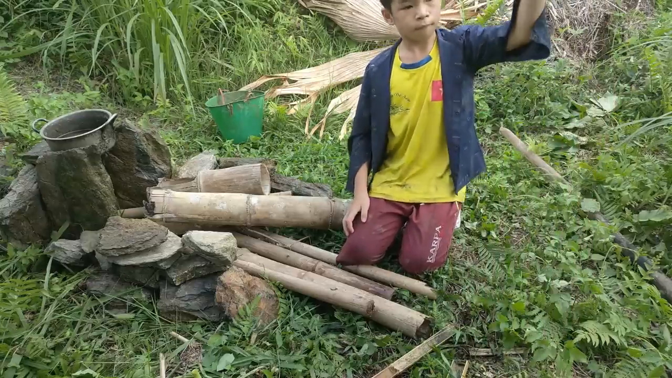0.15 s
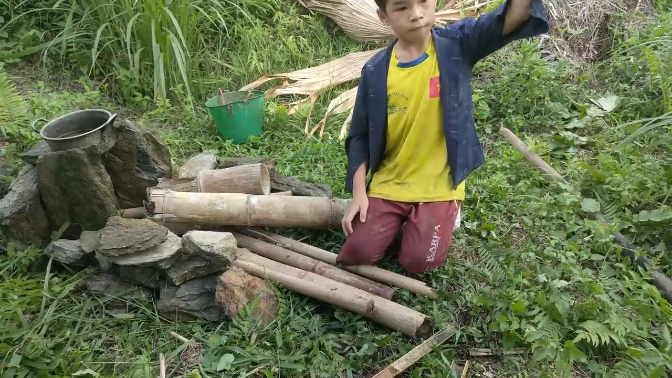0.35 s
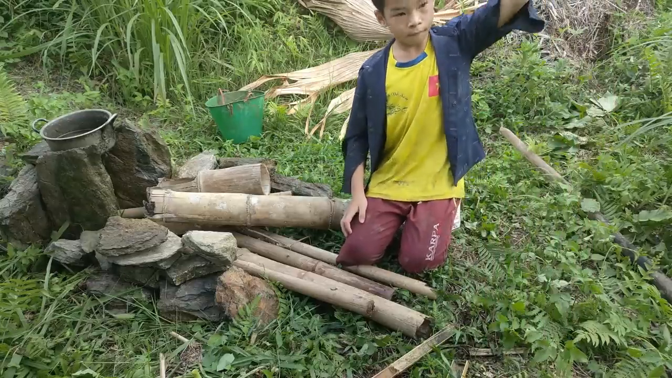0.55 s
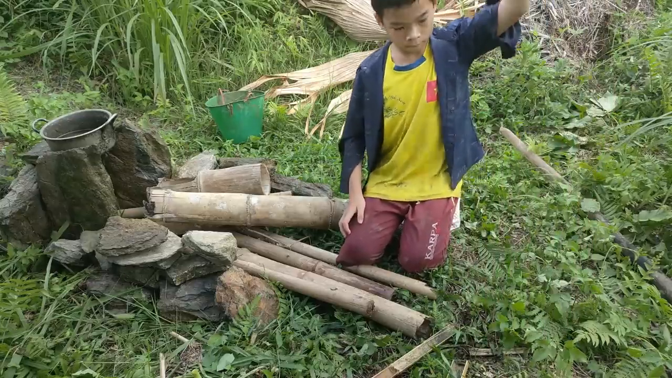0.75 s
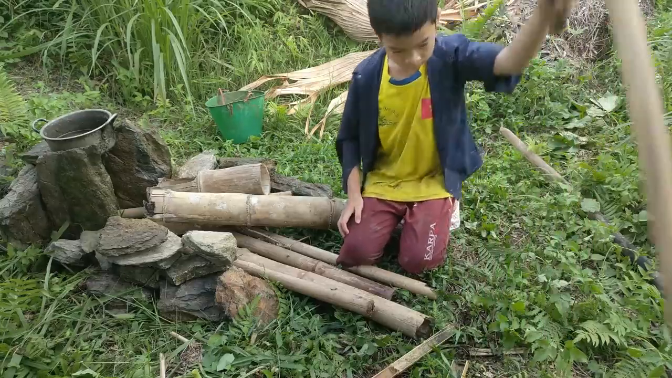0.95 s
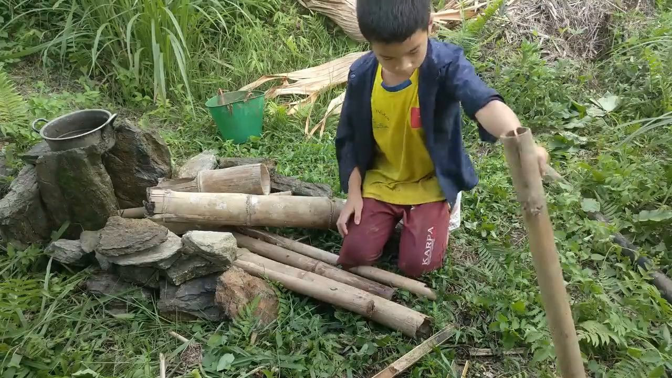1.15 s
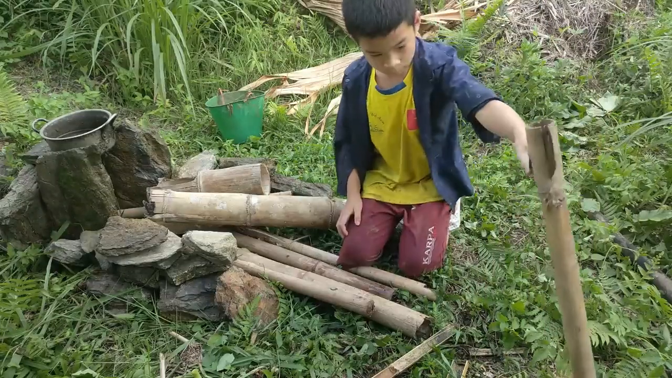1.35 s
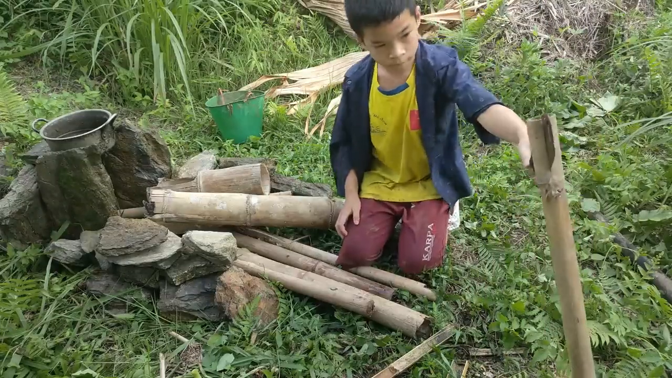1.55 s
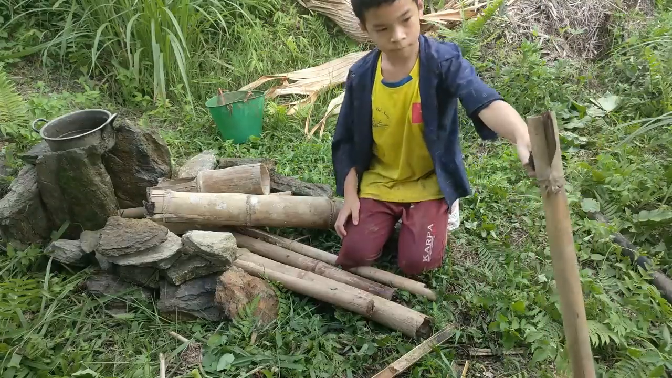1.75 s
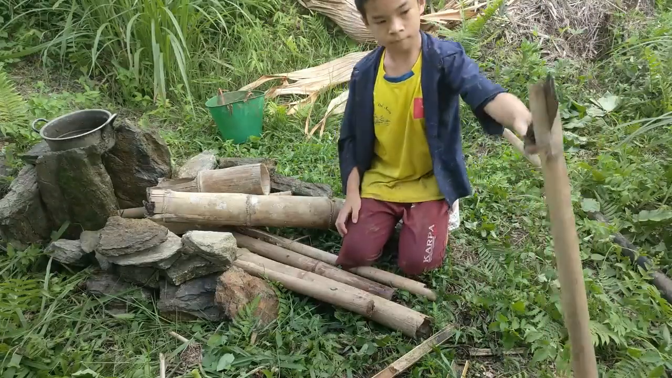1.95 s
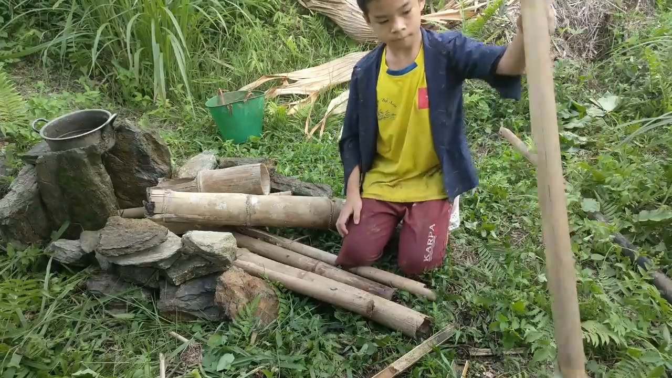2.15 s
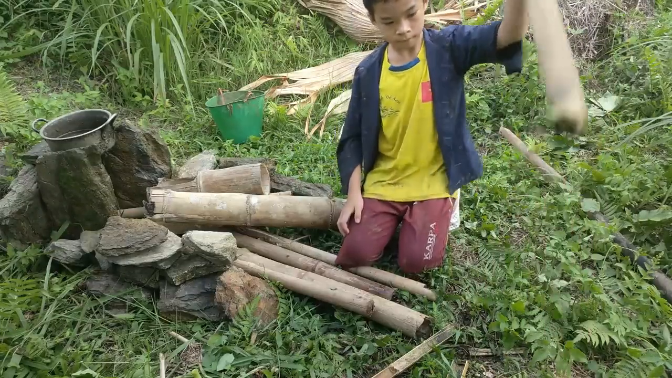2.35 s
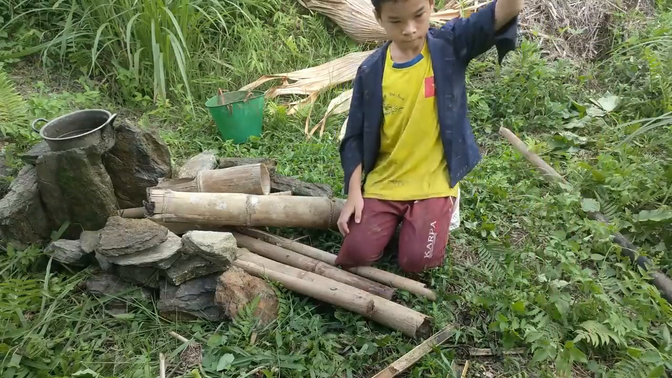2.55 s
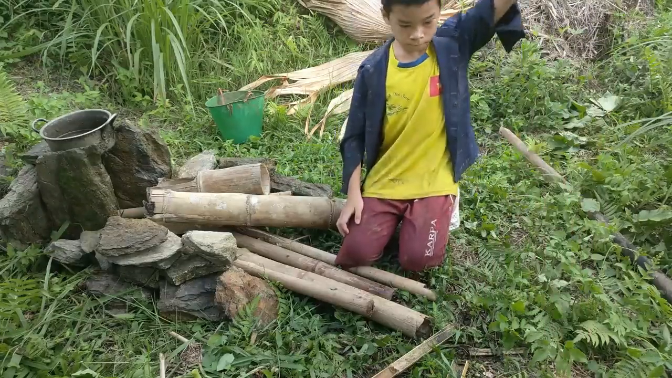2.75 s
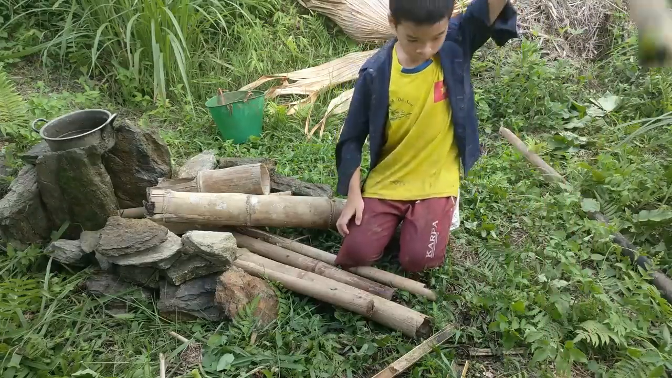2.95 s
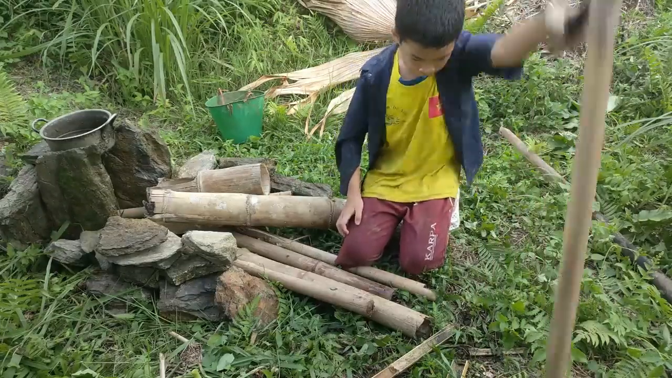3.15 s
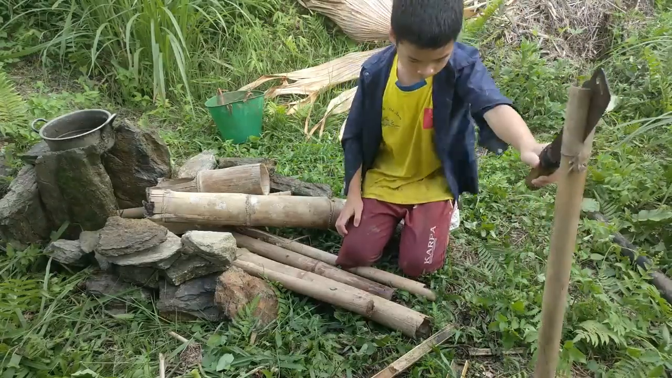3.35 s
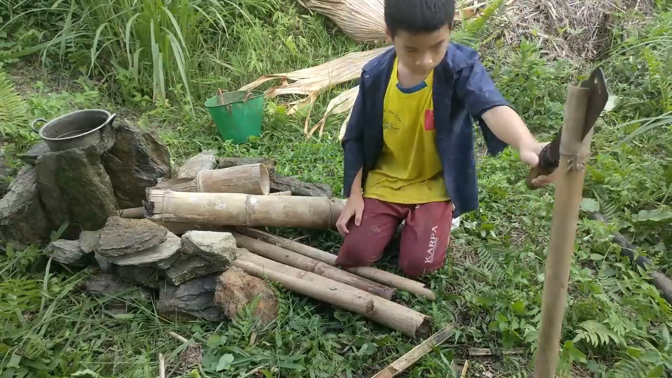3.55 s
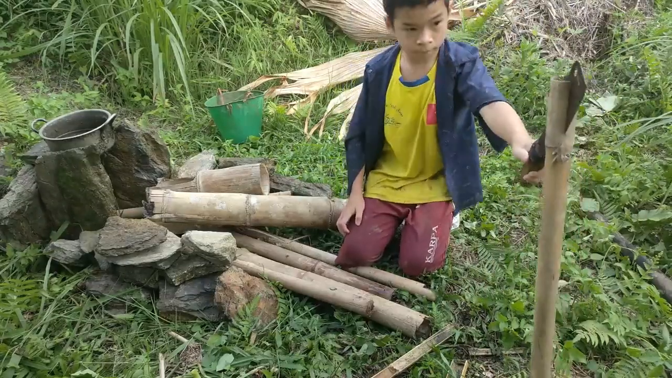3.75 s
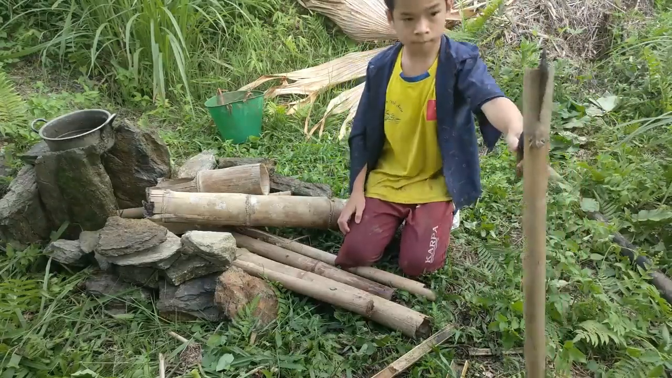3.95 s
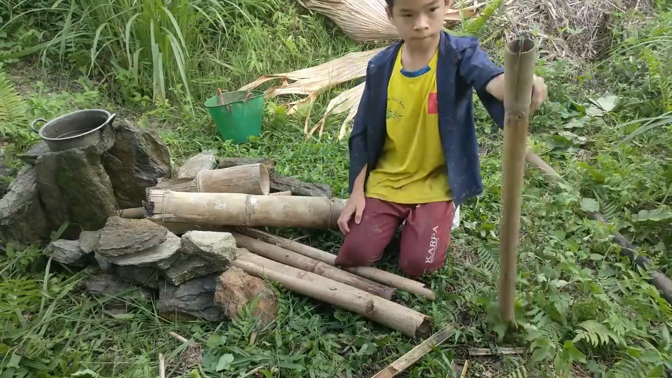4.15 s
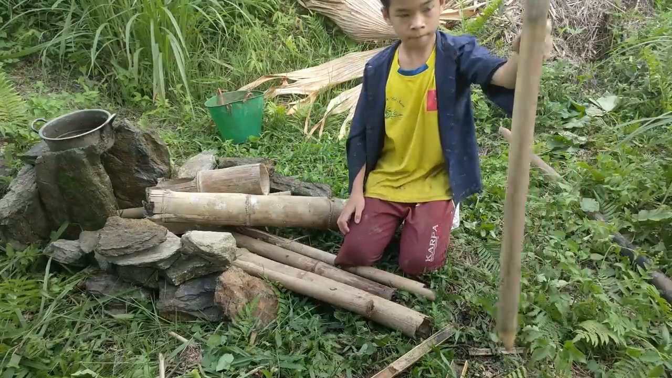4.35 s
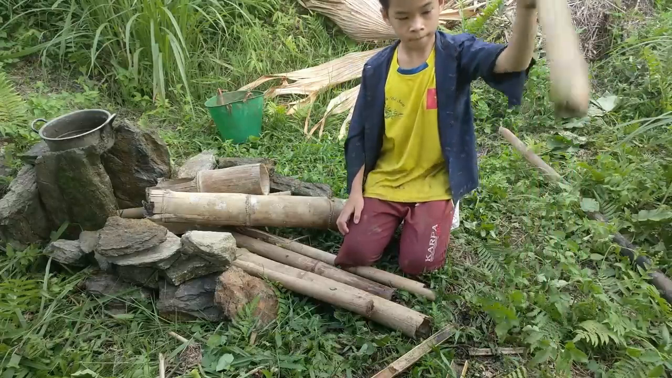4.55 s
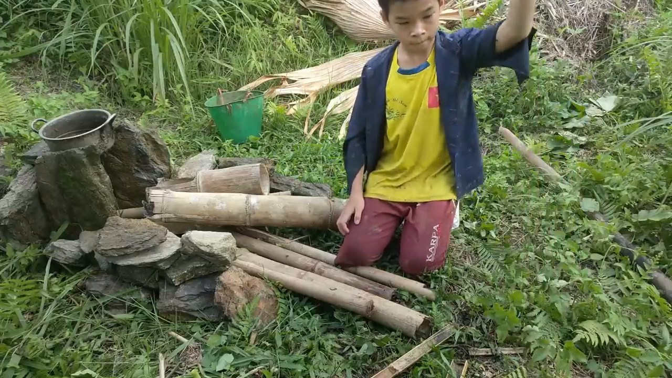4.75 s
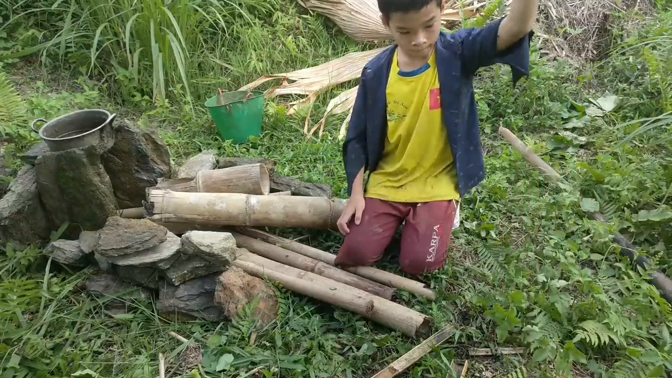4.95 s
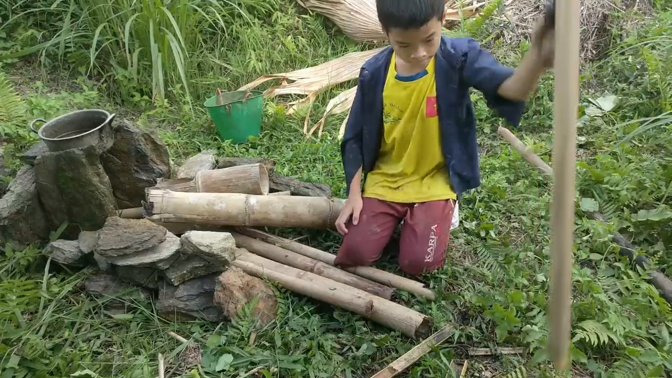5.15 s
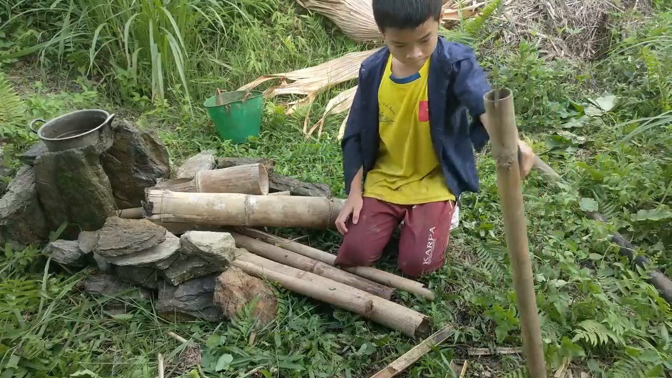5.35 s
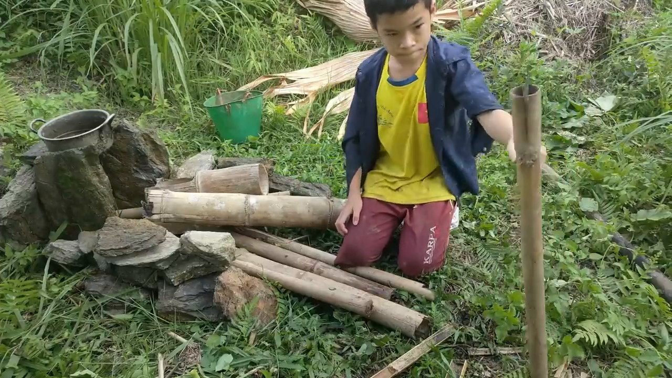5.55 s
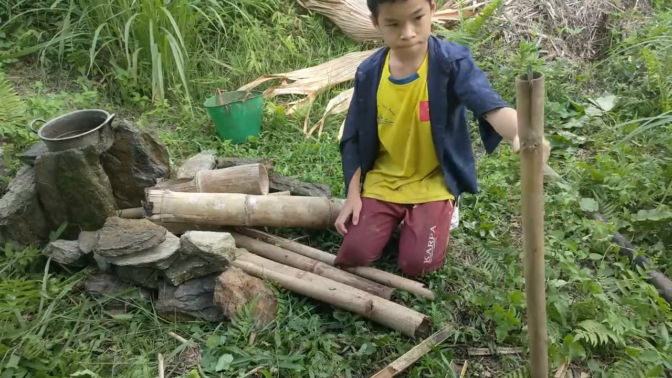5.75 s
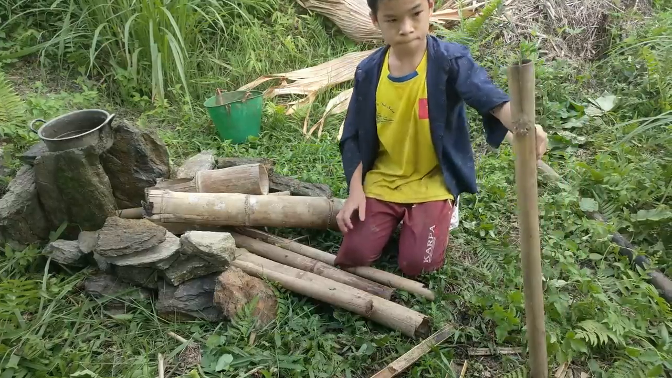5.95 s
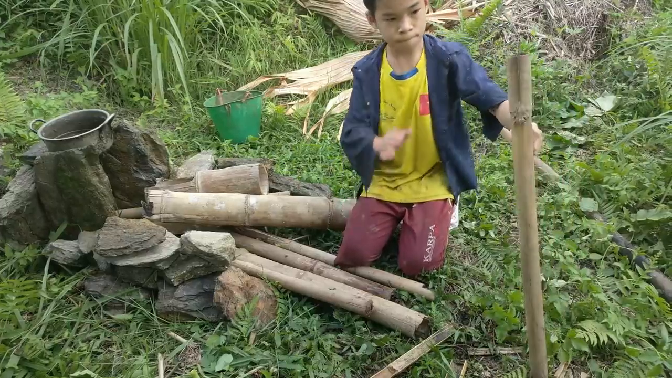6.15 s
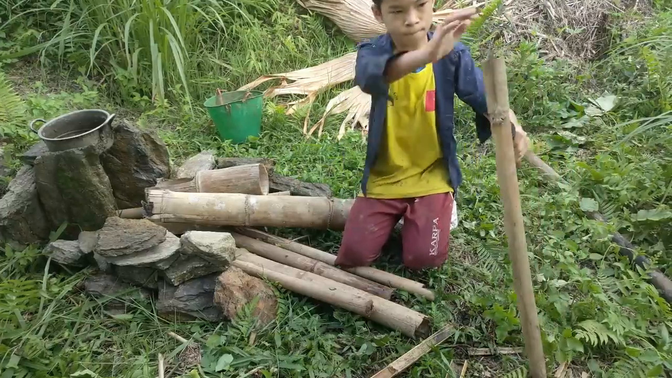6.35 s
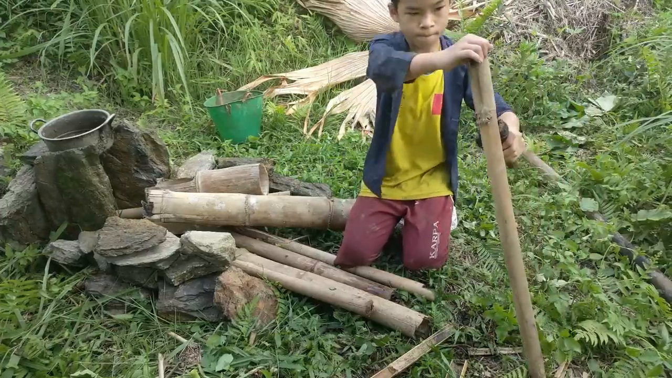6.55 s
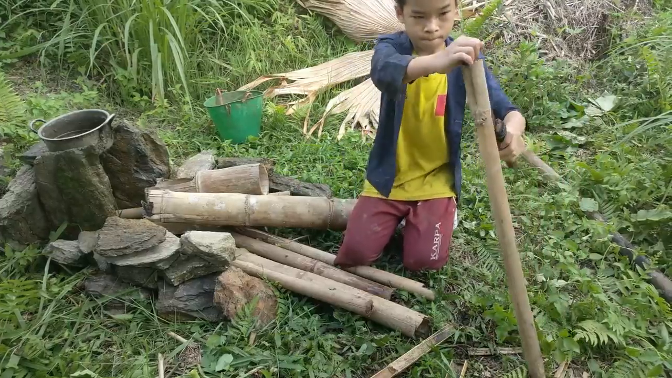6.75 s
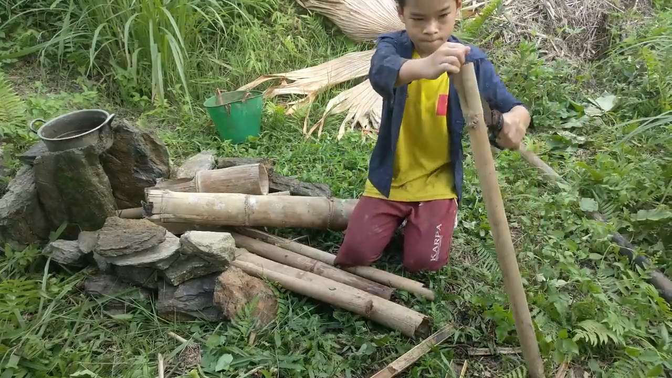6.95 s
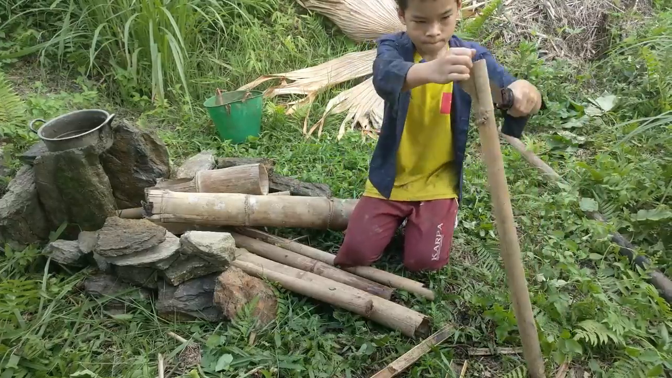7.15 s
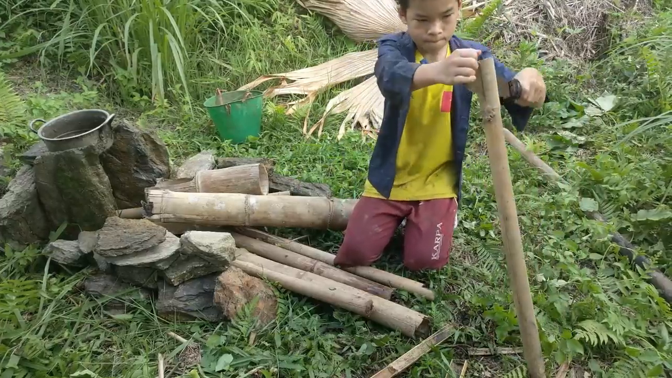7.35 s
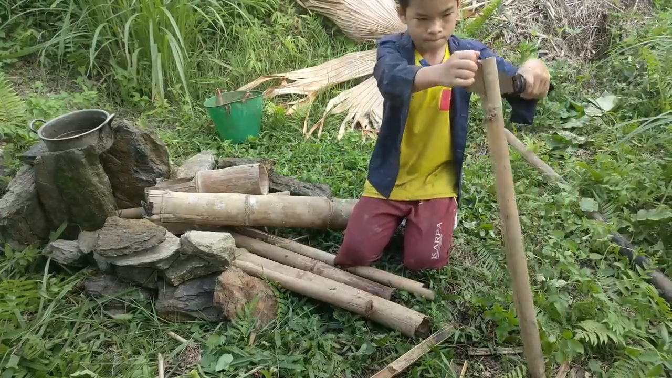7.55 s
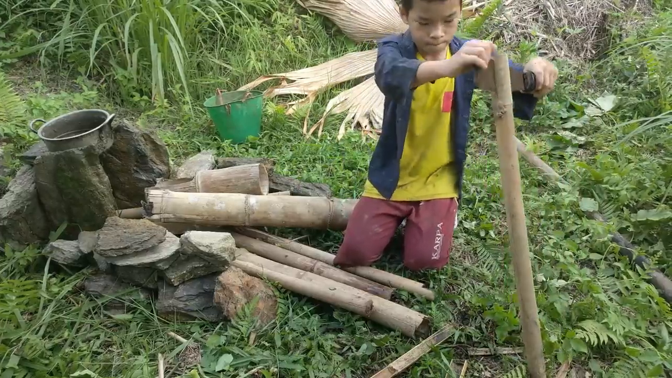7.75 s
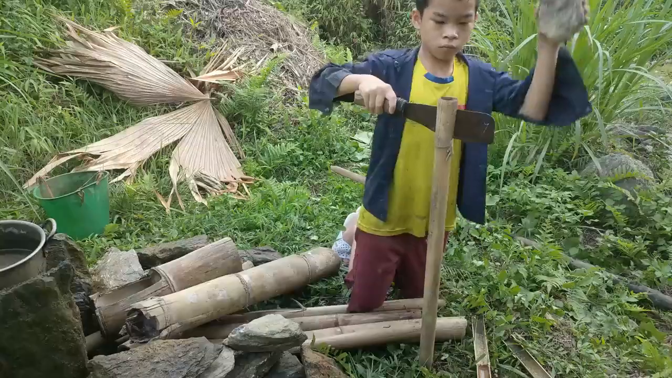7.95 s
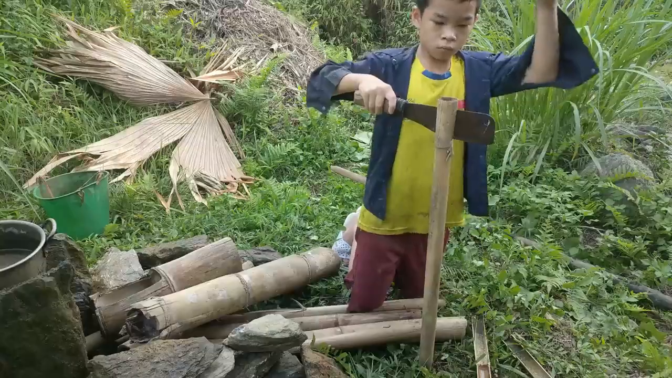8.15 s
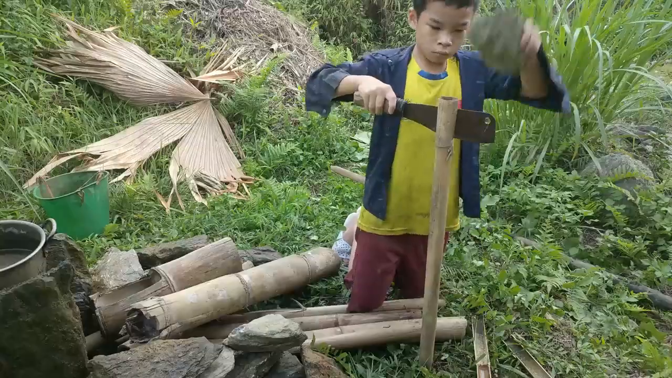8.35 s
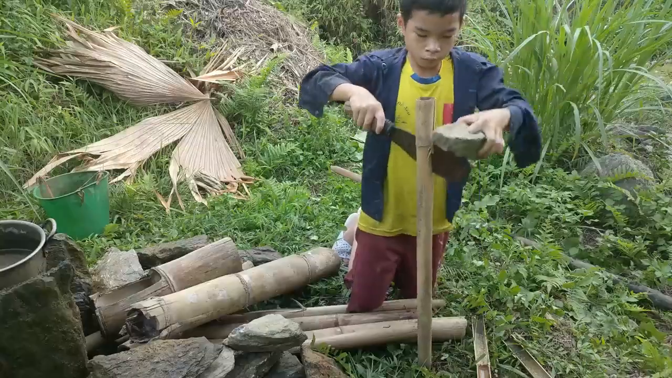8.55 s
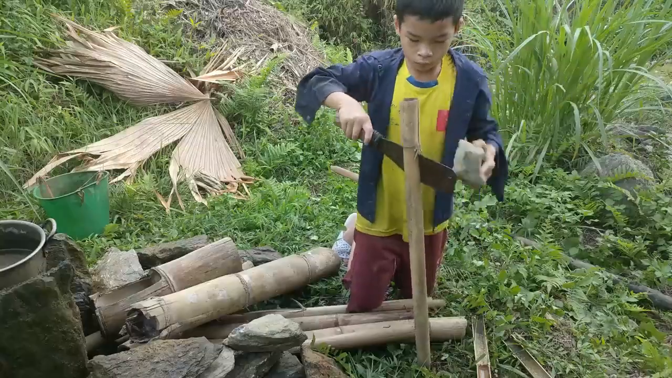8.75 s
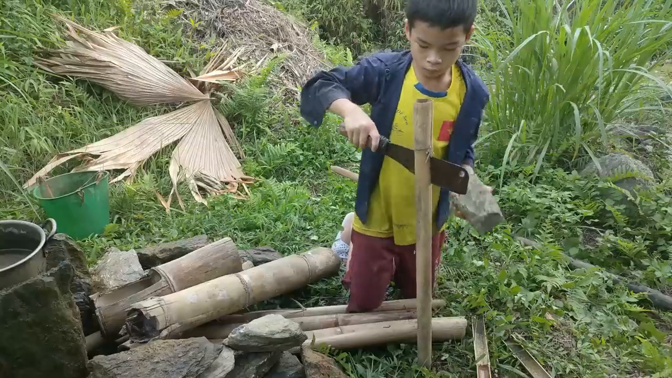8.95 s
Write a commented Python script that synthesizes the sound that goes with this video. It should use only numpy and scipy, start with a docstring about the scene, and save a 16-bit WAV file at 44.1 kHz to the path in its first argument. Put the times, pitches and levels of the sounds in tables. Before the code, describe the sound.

Outdoors among vegetation, a wide soft hiss of insects and air runs throughout. A cricket trills in half-second bursts about once a second near 4.9 kHz, with a fainter one answering; a one-cylinder engine putters far to the right, slightly stronger after 6 s. Tiny paired bird chips come near 0.2, 3.7 and 7.3 s, with occasional faint hoots. Close by, a small bright crack at 0.1 s. A bamboo pole slams on soil at 1.2 s, with a hollow crack and thump; again at 3.4 s, a longer, splintering cluster; and at 5.4 s, short and heavy. Soft knocks at 4.0, 4.1 and 6.1 s, then handling and dry scraping around 6.9-7.5 s. A light tick at 8.1 s precedes a stone's loud blow at 8.54 s, cracking and ringing split bamboo and blade, with scraping and knocks until 8.8 s. Background ducks after loud blows, then recovers by 9 s.

```python
"""Throughout, wide air, a one-cylinder engine far to the right, trilling crickets, a few bird chips and hoots.
Close to the microphones a bamboo pole with a wedged knife cracks, then is slammed on soil near 1.2, 3.4 and 5.4 s.
It is handled and scraped between blows; from 7.9 s, split open, it and the blade ring under a stone.
Bursts of snapping-fibre noise stir resonances of pole and blade; short pushes stir air and ground; chirps,
chips and hoots are sine tones, and puffs drive the exhaust. Gain control ducks after each loud blow."""
import sys
import numpy as np
from scipy import signal
from scipy.fft import rfft, irfft, next_fast_len
from scipy.io import wavfile
from scipy.ndimage import uniform_filter1d, map_coordinates

SR = 44100
rng = np.random.default_rng(int(sys.argv[2]) if len(sys.argv) > 2 else 0)


def pcm_store(signal):
    """Save signal as 16-bit PCM."""
    levels = np.round(np.clip(np.atleast_2d(signal), -1, 1) * 32767)
    wavfile.write(sys.argv[1], SR, levels.astype(np.int16).T)


N = 397782


def amp(db):
    """Amplitude factor of a level in dB."""
    return 10 ** (np.asarray(db) / 20)


def unit(x):
    """x scaled to an RMS of one."""
    return x / np.sqrt(np.mean(x ** 2) + 1e-20)


def along(points, hz):
    """Values at hz between (frequency, value) points on a log axis."""
    f, v = np.transpose(points)
    return np.interp(np.log(hz + 1), np.log(f + 1), v)


def curves(rows):
    """One value per sample for each column after the time."""
    s, *cols = np.transpose(rows)
    return [np.interp(np.arange(N) / SR, s, c) for c in cols]


def wobble(rate):
    """A smooth random curve, rate knots a second."""
    knots = rng.standard_normal(int(N * rate / SR) + 4)
    return map_coordinates(knots, [np.arange(N) * rate / SR])


def filtered(x, response):
    """x times a complex response of frequency."""
    m = next_fast_len(N + SR // 2)
    return irfft(rfft(x, m) * response(np.fft.rfftfreq(m, 1 / SR)), m)[..., :N]


def resonant(x, modes):
    """x through causal resonances of alternating sign, scaled so that white noise keeps its power."""
    def gain(f):
        total = 0
        for k, (centre, width, db) in enumerate(modes):
            damping = 1j * f * width
            total = total + (-1) ** k * amp(db) * damping / (centre * centre - f * f + damping)
        return total
    return filtered(x, gain) / np.sqrt(np.mean(abs(gain(np.arange(SR / 2))) ** 2))


def add(track, s, sound):
    """Mix a sound in at s seconds."""
    k = max(round(s * SR), 0)
    track[k:k + len(sound)] += sound[:len(track[k:])]


def placed(x, lag_s, pan_db):
    """Arrival at the microphone pair: left lags right by lag_s and is pan_db louder."""
    side = np.array([[.5], [-.5]])
    return amp(pan_db * side) * filtered(x * np.ones((2, 1)), lambda hz: np.exp(-2j * np.pi * hz * lag_s * side))


FAR_LAG_S = 4.5e-4  # far sounds reach the left microphone later
PATCH_FROM_HZ = 300  # the bass of the background stays even
# far insects, leaves and air: (time [s], level [dB])
AIR_LEVEL = [(0, -46.5), (1, -47.5), (2.3, -47.5), (3.2, -46.5), (4.3, -47.5), (5.2, -46.5), (6.2, -45.5),
             (7.5, -46), (8.3, -46.5), (9, -43.5)]
# their spectrum: (frequency [Hz], relative density [dB per Hz])
AIR_COLOUR = [(12, -34), (25, -2), (60, -10.5), (120, -8), (240, -14), (450, -14.5), (740, -12.5),
              (1150, -17.5), (2020, -16), (3500, -20.5), (4900, -14.5), (5850, -17.5), (6360, -32.5),
              (7450, -14), (8300, -36.5), (9200, -49.5), (16000, -33)]
# how alike the two microphones hear them: (frequency [Hz], likeness [0 to 1])
AIR_LIKENESS = [(30, 0.5), (60, 1), (200, 1), (400, 0.99), (900, 0.38), (2500, 0.44), (5000, 0.023)]


def field(patchy_db):
    """Background noise with patches of random gain, wide in the treble, lagging on the left like the engine."""
    bins, _, z = signal.stft(rng.standard_normal((2, N)), SR, nperseg=512)
    patches = uniform_filter1d(rng.standard_normal(z.shape[1:]), 5, 0)  # across frequency
    patches = uniform_filter1d(patches, 8, 1)  # across time
    gain = amp(patchy_db * unit(patches) * (bins > PATCH_FROM_HZ)[:, None])
    pair = signal.istft(z * gain, nperseg=512)[1][:, :N]

    def mid_side_gain(hz):
        turn = np.arccos(np.clip(along(AIR_LIKENESS, hz), -1, 1)) / 2
        return amp(along(AIR_COLOUR, hz)) * [np.cos(turn), np.sin(turn)]

    mid, side = filtered(pair, mid_side_gain)
    lagged = placed(np.array([mid + side, mid - side]), FAR_LAG_S, pan_db=0)
    return amp(curves(AIR_LEVEL)[0]) * unit(lagged)


# faint far hoots: (start [s], end [s], frequency [Hz], level [dB])
HOOTS = [(.65, 0.93, 827, -54), (4.1, 4.202, 862, -47.5), (4.208, 4.45, 415, -53.5),
         (4.853, 4.982, 408, -49.5), (5.639, 5.752, 716, -60), (5.768, 5.824, 735, -49)]


def hoots():
    """Soft far tones whose pitch and level waver together."""
    out, waver = np.zeros(N), wobble(22)
    for first, last, hz, db in HOOTS:
        part = waver[round(first * SR):round(last * SR)]
        tone = np.sin(2 * np.pi * hz * np.cumsum(1 + 0.01 * part) / SR)
        add(out, first, amp(db + part) * np.hanning(len(part)) * tone)
    return out


# pace of the far engine: (time [s], firings [per s])
ENGINE_SPEED = [(0, 14.72), (1.5, 14.94), (3, 14.59), (4, 15.82), (4.8, 15.73), (6, 15.01), (7.2, 14.23),
                (8, 14.87), (9.02, 15.89)]
# its loudness at this distance: (time [s], level [dB])
ENGINE_LEVEL = [(0, -56), (2.5, -55.5), (4.5, -54.5), (6.5, -49.5), (8.4, -52), (9, -52.5)]
# resonances of its exhaust pipe: (frequency [Hz], width [Hz], relative level [dB])
EXHAUST_MODES = [(172, 12.4, 10.5), (102, 26, -3.5), (204.3, 10, 1.5), (32, 17, -10.5)]


def engine():
    """One uneven puff per firing through the exhaust pipe."""
    count = np.floor(np.cumsum(curves(ENGINE_SPEED)[0]) / SR + .156)  # part of a cycle already run
    fired = np.diff(count, prepend=count[0]) > 0
    puffs = fired * amp(.9 * rng.standard_normal(N))
    return amp(curves(ENGINE_LEVEL)[0]) * unit(resonant(puffs, EXHAUST_MODES))


CHIP_DB, CHIP_GAP_S, PAIR_GAP_S = -42, .035, .185  # gaps run from start to start
# phrases of a small bird: (time [s], pairs of chips [count])
BIRD_PHRASES = [(.222, 2), (3.711, 3), (7.339, 2)]


def bird():
    """Pairs of short chips, each a tone gliding down."""
    out, t = np.zeros(N), np.arange(round(.016 * SR)) / SR
    glide = np.sin(2 * np.pi * (5550 * t - 24000 * t * t))
    chip = amp(CHIP_DB) * np.hanning(len(t)) * glide
    for s, pairs in BIRD_PHRASES:
        for k in range(pairs):
            add(out, s + PAIR_GAP_S * k, chip)
            add(out, s + PAIR_GAP_S * k + CHIP_GAP_S, chip)
    return out


CHIRP_S, STROKE_S = .0391, .011  # spacing of chirps, and of wing strokes in a chirp
RASP = .07  # phase wander of a wing stroke [radians a sample]


def cricket(trills, pitch_hz, late, strokes_db, uneven_db):
    """Trills that swell and rise a little; each chirp is three wing strokes of a tone."""
    out, t = np.zeros(N), np.arange(round(.0125 * SR)) / SR
    for first, last, db in trills:
        chirps = np.linspace(first, last, round((last - first) / CHIRP_S) + 1)
        for s in chirps[chirps > 0]:
            early = ((last - s) / .45) ** 2
            for k, stroke_db in enumerate(strokes_db):
                scatter, level, turn = rng.standard_normal(3)
                hz = pitch_hz * (1 + .004 * scatter - .01 * early)
                wander = np.cumsum(RASP * rng.standard_normal(len(t)))
                tone = np.sin(2 * np.pi * hz * t + 3 * turn + wander) * np.hanning(len(t))
                tone_db = db - 4.4 * early + stroke_db + uneven_db * level
                add(out, s + late + STROKE_S * k, amp(tone_db) * tone)
    return out


ECHO_DB, ECHO_S = -4, .08  # level and 60 dB decay time of the bushes' answer


def bushes(x):
    """x with a short scattered echo on each side."""
    t = np.arange(SR // 8) / SR
    tail = rng.standard_normal((2, len(t))) * amp(-60 * t / ECHO_S)
    return x + amp(ECHO_DB) * signal.fftconvolve(x, tail / np.linalg.norm(tail[0]), axes=1)[:, :N]


TRILL_DB = -44  # before the stroke levels
# louder cricket: (last chirp [s], chirps [count])
MAIN_TRILLS = [(.188, 12), (1.136, 13), (2.351, 12), (3.319, 12), (4.381, 12), (5.367, 13), (6.509, 13),
               (7.506, 12), (8.664, 12)]
# second, fainter cricket: (first chirp [s], last chirp [s], level before the stroke levels [dB])
ANSWERING_TRILLS = [(.25, .53, -53), (.64, 1.13, -48.5), (1.9, 2.33, -60), (2.85, 3.3, -53.5),
                    (3.46, 3.6, -45.5), (3.9, 4.36, -50.5), (4.57, 4.75, -51.5), (4.85, 5.36, -53.5),
                    (5.92, 6.3, -50.5), (7.1, 7.5, -52), (7.88, 7.96, -47)]


def crickets():
    """Two crickets of different pitch and place, echoed by the bushes."""
    trills = [(last - (chirps - 1) * CHIRP_S, last, TRILL_DB) for last, chirps in MAIN_TRILLS]
    louder = cricket(trills, 4905, -.016, [6.5, 8.5, 1.5], uneven_db=1.5)
    fainter = cricket(ANSWERING_TRILLS, 4666, -0.018, [5, 5, 3], uneven_db=2)
    return bushes(placed(louder, -0.000062, pan_db=0.8) + placed(fainter, 8e-5, pan_db=-4.0))


# pole end on soil: (time [s], thump before a common cut [dB], ground before it [dB])
LANDINGS = [(1.2116, -12, -31), (3.365, -16.5, -21.5), (5.38, -13.5, -19.5)]
# air column of the pole: (frequency [Hz], width [Hz], relative level [dB])
THUMP_MODES = [(157, 55, 15), (240, 230, 8.5)]
# the soil: (frequency [Hz], width [Hz], relative level [dB])
GROUND_MODES = [(93, 21, 0)]


def thuds():
    """The pole's end lands on soil: one short push rings the air column and the ground."""
    thump, ground, push = np.zeros(N), np.zeros(N), np.hanning(round(0.0014 * SR))
    for s, thump_db, ground_db in LANDINGS:
        add(thump, s, amp(thump_db) * push)
        add(ground, s, amp(ground_db) * push)
    return -amp(-7.0) * (resonant(thump, THUMP_MODES) + resonant(ground, GROUND_MODES))


CRUNCH_DB, CRUNCH_RISE_S = -22, 0.005


def crunches(effort):
    """Weeds and grit crushed just before the pole lands: effort growing in the wall and splinter layers."""
    before = np.arange(SR // 20) / SR
    for s, *_ in LANDINGS:
        for layer in effort[1:3]:
            add(layer, s - before[-1], amp(CRUNCH_DB) * np.exp(-before[::-1] / CRUNCH_RISE_S))


# single notes a blow leaves in the pole: (time [s], frequency [Hz], level [dB])
POLE_NOTES = [(1.177, 1353, -8.5), (1.209, 4250, -4.5), (3.365, 2000, -11), (3.375, 3910, -12),
              (3.392, 1880, -10), (3.425, 3920, -4), (4.132, 1480, -30.5), (5.38, 724, -18.5),
              (5.398, 1370, -17), (5.412, 1010, -37), (6.066, 964, -24), (6.066, 2840, -27),
              (6.966, 1054, -33), (8.08, 1300, -26), (8.539, 1310, -18), (8.555, 3790, -6),
              (8.575, 764, -26), (8.601, 1720, -13.5), (8.622, 800, -23), (8.713, 1490, -22.5),
              (8.736, 1010, -22.5), (8.736, 1520, -24), (8.759, 1510, -22), (8.759, 4550, -16),
              (3.375, 2080, -8), (1.22, 5720, -8), (1.203, 1045, -16), (1.18, 349, -21.5),
              (5.382, 507, -18), (8.538, 2920, -9.5), (8.712, 960, -26), (8.759, 800, -35),
              (8.808, 1730, -20)]


def ringing_notes():
    """Decaying sines: the wood damps each note by 60 dB in 65 cycles."""
    notes, t = np.zeros(N), np.arange(SR // 4) / SR
    for s, note_hz, note_db in POLE_NOTES:
        ring = amp(-60 * t * note_hz / 65) * (1 - np.exp(-t / 0.00028))
        add(notes, s, amp(note_db) * ring * np.sin(2 * np.pi * note_hz * t))
    return notes


RUB_RISE_DB_PER_S, RUB_FADE_DB_PER_S = 420, 205
RUB_HOLLOW_DB, RUB_WALL_DB = -10, -15  # share of a rub that reaches these layers
# blade and hand along the fibres: (time [s], hold [s], level [dB], splinter level relative to it [dB])
STROKES = [(2.06, 0.0046, -47.5, -2), (7.063, 0.026, -37, -9), (7.106, 0.04, -34.5, -9),
           (7.172, 0.026, -41.5, -9), (7.273, 0.01, -45, -15), (7.493, 0.026, -47, -11),
           (8.575, 0.12, -32.5, -3.5)]


def rubs(effort):
    """The blade catches and slips: wavering strokes join the effort; their sum is returned."""
    rubbing, now = np.zeros(N), np.arange(N) / SR
    for s, hold, db, bright_db in STROKES:
        rise_db = RUB_RISE_DB_PER_S * np.maximum(s - now, 0)
        fade_db = RUB_FADE_DB_PER_S * np.maximum(now - s - hold, 0)
        slips = amp(db - rise_db - fade_db + 2.2 * wobble(70))
        effort += slips * amp([[RUB_HOLLOW_DB], [RUB_WALL_DB], [bright_db], [bright_db - 35]])
        rubbing += slips
    return rubbing


RISE_S, FADE_S = 0.0008, 0.027  # attack; shortest 60 dB decay after the hold, before the layers' brevity
FADE_PER_HOLD = 1.1  # a long tearing crack also dies more slowly
TAIL_DB, TAIL_S = -8.5, 0.1  # weak after-crackle and its 60 dB decay, before the layers' brevity
HOLLOW_DB, HOLLOW_PER_BRIGHT = -9, -0.25  # hollow over the wall; a bright crack stirs it less
# cracks and knocks: (time [s], strength [dB], brightness over it [dB], sizzle [dB], hold [s],
# first snap over each layer's level [dB])
POLE_CRACKS = [(0.075, -30.5, 13, -24.5, 0.0015, 16.5), (1.17, -19.5, -6, -66, 0.024, -8),
               (1.196, -21, -6, -60, 0.02, 8), (1.212, -30, 12.5, -43, 0.0067, 15),
               (1.222, -31.5, 9.5, -42, 0.005, 22), (1.231, -56, 13, -60, 0.03, 3),
               (1.308, -38, 8.5, -46, 0.0023, 0), (3.363, -25, 6, -42, 0.0092, -10),
               (3.374, -23.5, 3.5, -34, 0.009, 6), (3.385, -19, 2.5, -28, 0.012, 4),
               (3.4, -20, 0, -32, 0.022, 18), (3.425, -19.5, 2.5, -35, 0.003, 10),
               (3.427, -31.5, 6, -34, 0.0022, 19), (3.957, -35, -41, -99, 0.0026, 21.5),
               (4.133, -37, -12, -114, 0.0057, -14), (5.378, -11.5, -0.5, -40, 0.0031, -5),
               (5.385, -18, -3.5, -55, 0.0046, -1), (5.39, -34, -4, -63, 0.0081, 0),
               (6.066, -25.5, -19, -75, 0.0036, 2), (6.906, -41, -38, -68, 0.0039, 3),
               (6.967, -40.5, -18, -78, 0.0054, 8), (8.079, -29, 5.5, -24, 0.0046, 5),
               (8.538, -12, -2, -22.5, 0.0022, 8), (8.542, -15.5, -2, -62, 0.0034, 18),
               (8.555, -15.5, 1, -44, 0.0023, 14.5), (8.566, -26, 1, -36, 0.0023, 11),
               (8.6, -27.5, -7, -46, 0.016, 18), (8.624, -32, -18, -49, 0.0072, 11),
               (8.7134, -31.5, -5, -48, 0.003, 20), (8.736, -33, 7, -35, 0.0022, 19),
               (8.7589, -19.5, -3.5, -40, 0.0013, 21), (8.8, -31, -16, -71, 0.008, 0),
               (8.812, -30, -20, -69, 0.0085, 10)]


def cracks():
    """Effort and first snap of each crack in four layers: hollow, wall, splinters and air."""
    snaps, effort, t = np.zeros((4, N)), np.zeros((4, N)), np.arange(SR // 4) / SR
    lead = 4 * RISE_S  # fibres give way just before the blow peaks
    for s, wall_db, bright_db, sizzle_db, hold, snap_db in POLE_CRACKS:
        after = np.maximum(t - lead - hold, 0)
        main_fade = amp(-60 * after / (FADE_S + FADE_PER_HOLD * hold))
        fade = np.maximum(main_fade, amp(TAIL_DB - 60 * after / TAIL_S))
        shape = fade * np.exp(np.minimum(t - lead, 0) / RISE_S)
        hollow_db = wall_db + HOLLOW_DB + HOLLOW_PER_BRIGHT * bright_db
        levels_db = hollow_db, wall_db, wall_db + bright_db, sizzle_db
        for layer, db, brevity in zip(effort, levels_db, (.9, 1.05, 1.1, 1.2)):  # treble comes and goes faster
            add(layer, s - lead, amp(db) * shape ** brevity)
        snaps[:, round(s * SR)] = amp(np.add(levels_db, snap_db))
    return effort, snaps


def fibres(spiky_db, alike, clumps):
    """Stereo stream of snapping fibres: noise whose samples have very unequal sizes and come in clumps."""
    size = clumps * amp(spiky_db * rng.standard_normal(N))
    shared, own = rng.standard_normal(N), rng.standard_normal((2, N))
    return unit(size * (np.sqrt(alike) * shared + np.sqrt(1 - alike) * own))


def sizzle_gain(hz):
    """Treble band of the air around the fibres, opening near 8 kHz and easing off above 13 kHz."""
    return 2 / (1 + (8000 / (hz + 1)) ** 16) / (1 + (hz / 13000) ** 2)


SPLIT_S, BLADE_DB = 7.9, -13.5  # when the pole is open around the blade; blade over the wall
# All modes below: (frequency [Hz], width [Hz], relative level [dB])
# hollow of the slammed pole
HOLLOW_MODES = [(413, 356, -12), (705, 540, -5), (1017, 270, -2)]
# hollow of the pole split open around the blade
SPLIT_HOLLOW_MODES = [(418, 1500, -9.5), (800, 160, 9.5), (1010, 110, 7.5)]
# wall of the pole
WALL_MODES = [(1300, 190, -2.5), (1520, 100, -3.5), (1671, 38, 1), (1880, 83, 1.5), (2190, 580, -2.5),
              (2900, 920, -9)]
# knife struck by the stone
BLADE_MODES = [(786, 7, -5), (1755, 9, 0)]
# whole pole under a soft contact
SCRAPED_MODES = [(1006, 84, -6.5), (1248, 39, -0.5), (1535, 39, 0), (2000, 120, -4), (2520, 33, -6),
                 (2820, 86, -10), (3380, 93, -9), (3800, 110, -10.5), (4780, 100, -9)]
# split halves under a soft contact
SPLIT_SCRAPED_MODES = [(803, 110, -2.5), (1700, 180, -2), (2020, 42, -8), (2350, 62, -5.5), (2800, 110, -6),
                       (3950, 1200, -20)]
# splinters
SPLINTER_MODES = [(3180, 530, 1.5), (3960, 560, 6), (4530, 440, 6), (5100, 970, 4.5), (5950, 750, 3),
                  (6520, 580, -1)]


def bamboo():
    """Snapping fibres, under each crack and rub, ring the hollow of the pole, its wall, splinters and the air."""
    effort, snaps = cracks()
    crunches(effort)
    rubbing = rubs(effort)
    hollow, wall, splinters, air = effort
    clumps = amp(1.5 * wobble(400))
    split = np.arange(N) > SPLIT_S * SR
    inside = hollow * fibres(5.1, 0.82, clumps) + snaps[0]
    pole = resonant(inside * ~split, HOLLOW_MODES) + resonant(inside * split, SPLIT_HOLLOW_MODES)
    surface = wall * fibres(8.8, 0.54, clumps) + snaps[1]
    pole += resonant(surface, WALL_MODES)
    pole += amp(BLADE_DB) * resonant(surface * split, BLADE_MODES)
    scrape = rubbing * fibres(5.4, 0.72, clumps)
    pole += resonant(scrape * ~split, SCRAPED_MODES) + resonant(scrape * split, SPLIT_SCRAPED_MODES)
    pole += resonant(splinters * fibres(3.2, 0.51, clumps) + snaps[2], SPLINTER_MODES)
    sizzle = filtered(air * fibres(3.4, 0.1, clumps) + snaps[3], sizzle_gain)
    return ringing_notes() + pole + sizzle


# the pole stands right of the microphones, later nearer the middle: (until [s], left lags right by [s])
POLE_PLACES = [(5.7, 1.7e-4), (7.9, 1e-4), (9.1, .55e-4)]


def pole_in_place(x):
    """The pole's sound, placed stretch by stretch."""
    stretch = np.searchsorted([until for until, _ in POLE_PLACES], np.arange(N) / SR)
    return sum(placed(x * (stretch == k), lag_s, pan_db=-1.5) for k, (_, lag_s) in enumerate(POLE_PLACES))


def scene():
    """Background, far sources, crickets and the near pole at the microphone pair."""
    far = placed(engine(), FAR_LAG_S, pan_db=-.6) + placed(bird(), 0, pan_db=-.8) + hoots()
    near = pole_in_place(bamboo() + thuds())
    return field(patchy_db=3.0) + far + crickets() + near


TOP_HZ = 15800  # upper edge of the band


def record(dry):
    """Gain control follows the lingering power of what passes, peaks round off, and the band is limited."""
    power = np.mean(dry ** 2, axis=0)
    for seconds in (.06, .35):
        keep = np.exp(-1 / (seconds * SR))
        power = signal.lfilter([1 - keep], [1, -keep], power)
    level = dry * (1 + power / amp(-28.0) ** 2) ** -.35
    rounded = level / (1 + np.abs(level / .9) ** 4) ** .25
    return filtered(rounded, lambda hz: hz < TOP_HZ)


dry = scene()
out = record(dry)
pcm_store(out)
```